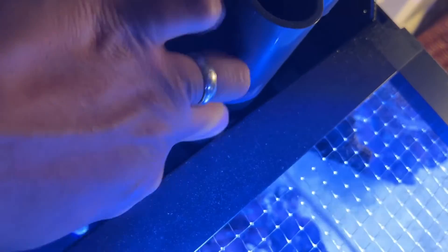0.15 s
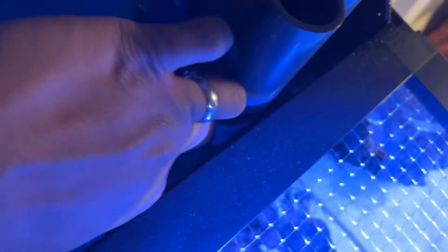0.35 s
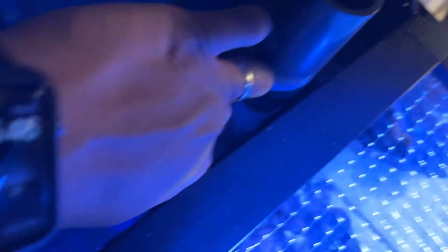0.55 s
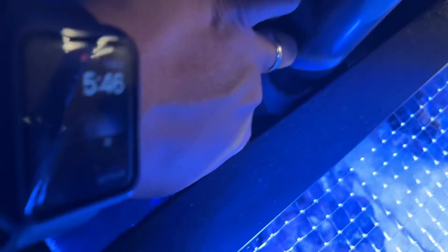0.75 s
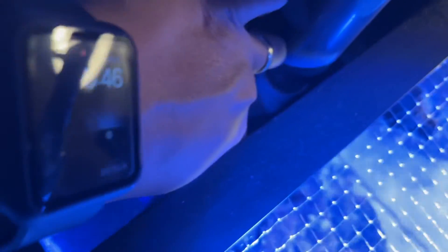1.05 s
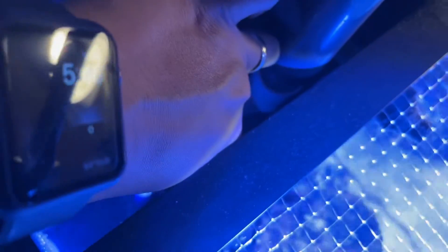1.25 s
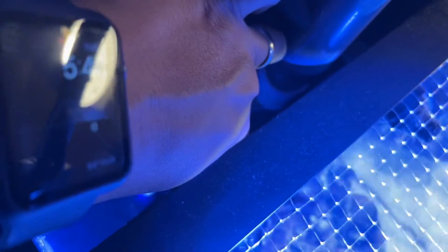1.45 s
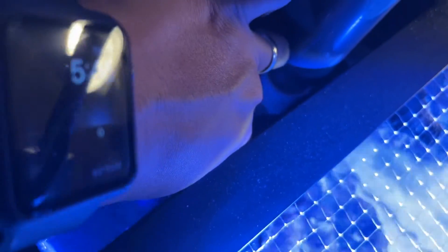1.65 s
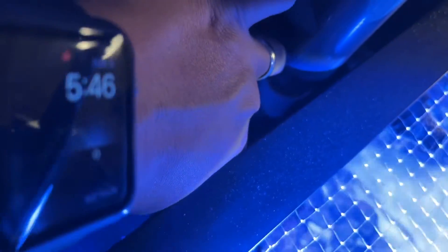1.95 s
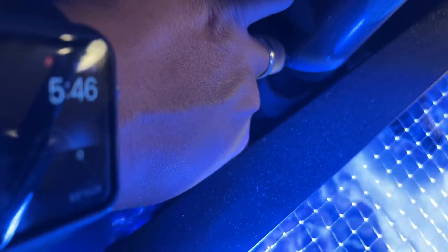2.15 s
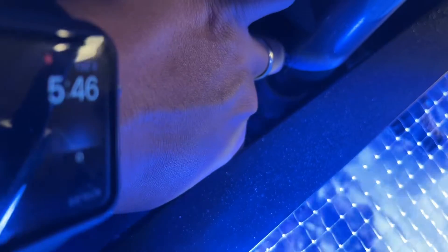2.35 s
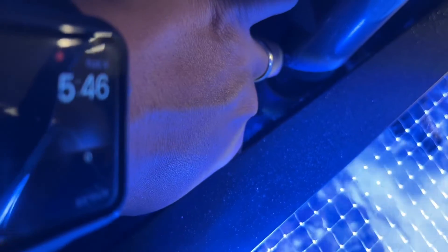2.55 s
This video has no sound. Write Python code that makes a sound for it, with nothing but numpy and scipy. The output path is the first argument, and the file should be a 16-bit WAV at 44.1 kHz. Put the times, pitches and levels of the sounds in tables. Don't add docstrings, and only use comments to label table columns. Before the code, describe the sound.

Water trickles into a hollow aquarium chamber with fine hiss, small drips and pitched overflow gulps, while a pump hums low and ticks rapidly; close stereo pickup, indoors, very little echo.

```python
import sys
import numpy as np
from scipy import signal
from scipy.fft import rfft, irfft, next_fast_len
from scipy.io import wavfile
from scipy.ndimage import uniform_filter1d, map_coordinates

SR = 44100
rng = np.random.default_rng(int(sys.argv[2]) if len(sys.argv) > 2 else 0)


def gain_from_decibels(decibels):
    exponent = np.asarray(decibels, float) / 20
    return 10 ** exponent


def store_pcm(level_fs):
    pcm = np.round(np.clip(level_fs, -1, 1) * 32767).astype(np.int16)
    wavfile.write(sys.argv[1], SR, np.atleast_2d(pcm).T)


N = 119070


def unit(x):
    return x / np.sqrt(np.mean(x ** 2) + 1e-20)


def along(points, hz):
    f, v = np.transpose(points)
    return np.interp(np.log(hz + 1), np.log(f + 1), v)


def curve(rows):
    return np.interp(np.arange(N) / SR, *np.transpose(rows))


def wobble(rate_hz):
    knots = rng.standard_normal(int(N * rate_hz / SR) + 4)
    return map_coordinates(knots, [np.arange(N) * rate_hz / SR])


def filtered(x, response):
    m = next_fast_len(N + 8192)
    return irfft(rfft(x, m) * response(np.fft.rfftfreq(m, 1 / SR)), m)[..., :N]


def patchy(patchy_db):
    z = signal.stft(rng.standard_normal((2, N)), nperseg=256)[2]
    field = uniform_filter1d(rng.standard_normal(z.shape[1:]), 5, 0)
    field = uniform_filter1d(field, 8, 1)
    return signal.istft(z * gain_from_decibels(patchy_db * unit(field)), nperseg=256)[1][:, :N]


def resonances(x, peaks):
    def response(f):
        total = 0
        for k, (hz, width_hz, db) in enumerate(peaks):
            damping = 1j * f * width_hz
            total = total + (-1) ** k * gain_from_decibels(db) * damping / (hz * hz - f * f + damping)
        return total
    return filtered(x, response)


def bubbles(s, db, hz, cycles, rise, onset=0.65, size=900):
    u = np.arange(size) / SR * hz[:, None]
    tone = np.sin(2 * np.pi * u * (1 + rise * u / (2 * cycles)))
    envelope = np.exp(-u / cycles) * (1 - np.exp(-(u / onset) ** 2))
    wave = gain_from_decibels(db)[:, None] * tone * envelope
    at = (s * SR).astype(int)[:, None] + np.arange(size)
    return np.bincount(at.ravel(), wave.ravel(), N + size)[:N]


def swarm(count, hz, spread, cycles, scatter_db):
    pair = []
    for _ in range(2):
        r = rng.random((count, 2))
        pitch_hz = np.clip(hz * np.exp(spread * rng.standard_normal(count)), 300, 15000)
        level_db = -scatter_db * np.log(1.36 * r[:, 1] + 0.035)
        pair.append(bubbles(r[:, 0] * N / SR, level_db, pitch_hz, cycles, 0.1155, size=600))
    return unit(np.array(pair))


def with_room(x):
    t60_s, room_db = .09, -11
    t = np.arange(SR // 5) / SR
    tail = rng.standard_normal((2, len(t))) * gain_from_decibels(-60 * t / t60_s)
    tail = tail / np.linalg.norm(tail[0])
    wet = signal.fftconvolve(x[None], tail, axes=1)[:, :N] * gain_from_decibels(room_db)
    return np.array([x + wet[0], wet[1] + .5 * np.roll(x, 40)])


# time in seconds, level in dB.
HUM = [(0.0, -37.5), (0.04, -36), (0.3, -36), (0.97, -38.5), (1.07, -37.5), (1.19, -40), (1.44, -37.5),
       (2.66, -37.5), (2.7, -40)]
# frequency in Hz, density in dB per Hz.
RUMBLE = [(25, -41), (58, -10), (82, -9.5), (102, -8.5), (142, -2.5), (178, -5), (300, -13.5), (500, -25)]


def pump():
    hum_hz, start_rad, rumble_db = 120.0, 2.2, -44.5
    phase = 2 * np.pi * hum_hz * np.arange(N) / SR + start_rad + 0.059 * wobble(7.8)
    hum = np.sqrt(2) * gain_from_decibels(curve(HUM)) * np.cos(phase)
    spectrum = [(11, -96), *RUMBLE, (800, -41), (1200, -95)]
    rumble = unit(filtered(patchy(0.74), lambda f: gain_from_decibels(along(spectrum, f))))
    return hum * [[1], [0]] + gain_from_decibels(rumble_db) * rumble


# frequency in Hz, level in dB, t60 in seconds, delay in seconds.
CASING = [
    (720, -5, .045, .003),
    (850, -2, .045, .004),
    (1060, -2, .016, 0),
    (1250, -1, .027, 0),
    (980, -8.5, .02, .0185),
]
# time in seconds, lag behind an even turn in ms.
ROTOR_LATE = [(0, .5), (.23, 4), (.74, -.8), (1.13, 2.5), (1.45, -.8), (1.71, .8), (1.89, 5.3), (2.15, 2.5),
              (2.3, -1), (2.7, .8)]


def rotor():
    start_s, ticks_per_s, tick_db, scatter_db = .0247, 11.27, -33, .7
    out = np.zeros(N + SR)
    t = np.arange(SR // 10) / SR
    attack = 1 - np.exp(-t / .0006)
    for s in np.arange(start_s, N / SR, 1 / ticks_per_s):
        r = rng.standard_normal((len(CASING) + 1, 3))
        late_s = np.interp(s, *np.transpose(ROTOR_LATE)) / 1000
        tick = gain_from_decibels(tick_db + scatter_db * r[-1, 1]) / 2
        for (hz, db, t60_s, delay_s), (a, b, c) in zip(CASING, r):
            tone = np.sin(2 * np.pi * hz * (1 + .015 * b) * t + .3 * c)
            ring = gain_from_decibels(db + a - 60 * t / t60_s) * tone * attack
            out[round((s + late_s + delay_s) * SR):][:len(t)] += tick * ring
    return with_room(out[:N])


# time in seconds, level in dB.
FLOW = [(0.0, -59.5), (.4, -57.5), (.75, -61), (1.2, -59.5), (2.0, -61), (2.7, -61)]
# frequency in Hz, width in Hz, level in dB.
CHAMBER = [(322, 105, -5), (720, 83, 2), (858, 222, -2.5), (1082, 91, -3.5), (1308.4, 22.6, -3.5),
           (2563, 283, -15)]
# frequency in Hz, density in dB per Hz.
HISS = [(1200, 1.5), (2000, -2.5), (3400, -6.5), (4800, -2.5), (7600, -6.5), (8700, 2), (9800, -5.5),
        (15700, -8.5)]


def trickle():
    chamber_db, bubble_db = -53, -60.5
    hiss_db, fizz_db, spray_db = 3.5, -4.5, -12
    flow_db = curve(FLOW)
    swing_db = flow_db - flow_db.mean()
    hollow = unit(resonances(patchy(1.4), CHAMBER))
    hollow = gain_from_decibels(chamber_db + .5 * swing_db + wobble(9.3)) * hollow
    gurgle = swarm(count=500, hz=993, spread=0.3365, cycles=3.87, scatter_db=4.0)
    gurgle = gain_from_decibels(bubble_db + swing_db) * gurgle

    def coloured(x):
        return unit(filtered(x, lambda f: gain_from_decibels(along([(600, -78), *HISS], f))))

    hiss = gain_from_decibels(hiss_db + 0.18 * wobble(14)) * coloured(patchy(2.6))
    fizz = swarm(count=1500, hz=5084, spread=.5, cycles=5.9, scatter_db=2.5)
    spray = swarm(count=400, hz=11000, spread=.25, cycles=1.5, scatter_db=4)
    surface = hiss + gain_from_decibels(fizz_db) * coloured(fizz) + gain_from_decibels(spray_db) * coloured(spray)
    return hollow + gurgle + gain_from_decibels(flow_db) * surface


# start in
# seconds, peak in dB, pitch in Hz.
GULPS = [(0.293, -43.5, 1386), (0.38, -45, 1330), (0.468, -39, 1420), (0.539, -33.5, 1490),
         (0.571, -29, 1560), (0.646, -40, 1510), (0.733, -40, 1500), (0.837, -44, 1560), (0.899, -38, 1440),
         (1.073, -35, 1466), (1.09, -58, 1390), (1.109, -32, 1516), (1.126, -38, 1550), (1.558, -32, 1490),
         (1.575, -26.5, 1490), (1.608, -33.5, 1500), (1.699, -36, 1560), (1.754, -43, 1540),
         (1.775, -32, 1560), (1.822, -44, 1560), (1.983, -32.5, 1415), (2.122, -32, 1490),
         (2.231, -36.5, 1465), (2.304, -34.5, 1510), (2.359, -40, 1560), (2.419, -43, 1375)]
# frequency in Hz, gain in dB.
TUBE_EDGE = [(900, 1), (1250, 12), (1500, 3.5), (1680, 1.5), (1780, -38), (2500, -44)]
# frequency in Hz, width in Hz, level in dB.
LINGER = [(1558, 30, -4)]


def tube():
    drone_db, gulp_db = -65, 10
    blow = rng.standard_normal(N) * gain_from_decibels(2.0 * wobble(39.6))
    drone = gain_from_decibels(drone_db) * unit(resonances(blow, [(1560, 58, 0), (1350, 400, -8)]))
    s, db, hz = np.transpose(GULPS)
    gulps = bubbles(s + .001, db + gulp_db, hz, cycles=3.45, rise=0.017, onset=5.1, size=1200)
    across = filtered(drone + gulps, lambda f: gain_from_decibels(along(TUBE_EDGE, f)))
    return across * [[1], [-.75]] + resonances(np.roll(across, 150), LINGER)


# start in seconds, peak in dB, pitch in Hz.
PRICKS = [(0.2134, -48, 12200), (0.2942, -49, 12000), (0.3376, -43, 11900), (0.3561, -47, 11600),
          (0.636, -44, 11500), (0.7292, -49, 11900), (0.7766, -47, 11300), (0.8609, -47, 10600),
          (0.9313, -47, 12400), (1.053, -44, 12400), (1.109, -42, 11600), (1.1298, -48, 13200),
          (1.1882, -52, 12600), (1.3463, -52, 10300), (1.508, -46, 10200), (1.5808, -44, 13400),
          (1.6182, -45, 11600), (1.7454, -51, 12700), (1.8866, -50, 12800), (1.9744, -53, 11700),
          (2.0188, -48, 11700), (2.0457, -47, 11700), (2.4768, -52, 10800), (2.5142, -51, 13100),
          (2.5666, -51, 13000), (2.5945, -48, 11400), (2.6863, -46, 12100)]
# start in seconds, peak in dB, pitch in Hz.
DROPLETS = [(0.154, -53, 3800), (0.4583, -46, 4100), (0.6687, -49, 4440), (0.7128, -51, 4270),
            (0.7377, -52, 5770), (0.832, -48, 5680), (0.9066, -46.5, 4080), (1.0103, -52, 4280),
            (1.0345, -46, 5030), (1.5324, -46, 6270), (1.5574, -50, 4640), (1.5815, -48, 5670),
            (1.7295, -52, 5650), (1.7875, -45, 4830), (1.8297, -46.5, 5810), (1.8871, -50, 4680),
            (2.139, -44.5, 5800), (2.157, -54, 3900), (2.269, -49, 4770), (2.3555, -51, 4750),
            (2.3636, -48, 4200), (2.6279, -53, 4300)]
# start in seconds, peak in dB, pitch in Hz.
BLIPS = [(0.1111, -49, 2700), (0.4454, -53, 2230), (0.4584, -45.5, 2310), (0.5392, -48, 1730),
         (0.5601, -50, 2040), (0.5726, -45, 1650), (0.605, -44, 1740), (0.9495, -48, 2600),
         (1.035, -52, 2330), (1.1278, -43.5, 1700), (1.4436, -49, 2640), (1.6618, -50, 1710),
         (1.774, -48, 1820), (1.8068, -57, 2090), (2.1216, -49, 1760), (2.2276, -52, 2400),
         (2.2942, -54, 2450), (2.325, -45, 1820)]


def sprinkle():
    out = 0
    for rows, more_db, cycles in [(PRICKS, 5, 4.3), (DROPLETS, 3, 7.5), (BLIPS, 1.5, 5.3)]:
        s, db, hz = np.transpose(rows)
        out = out + bubbles(s, db + more_db, hz, cycles, 0.043, size=900)
    return out


# start in seconds, peak in dB, pitch in Hz.
DROPS = [(0.2605, -38.5, 4400), (0.3725, -43.5, 1710), (.416, -37, 692), (0.6424, -40, 1720),
         (0.659, -42.5, 2080), (.597, -47, 2200), (.615, -47, 2210), (.764, -34, 720), (0.837, -45.5, 1680),
         (.836, -41, 5730), (0.8633, -47, 4470), (0.9018, -37.5, 1810), (1.052, -41, 4150),
         (1.1804, -37.5, 6000), (1.239, -39, 5840), (1.323, -40, 5800), (1.4594, -38.5, 2610),
         (1.5622, -42.5, 1780), (1.8756, -43, 5670), (1.849, -42.5, 698), (2.025, -38.5, 940),
         (2.221, -39, 5900), (2.362, -43.5, 1780), (2.4034, -39.5, 4420), (2.524, -34.5, 960)]
# start in seconds, peak in dB, pitch in Hz.
SPITS = [(0.111, -40, 12600), (0.2644, -39, 12090), (0.3563, -36, 9100), (.404, -39, 10800),
         (0.4589, -34, 11000), (1.07, -37, 10800), (1.533, -35, 7500), (1.5817, -40, 9400),
         (1.68, -37, 14000), (1.6888, -31.5, 8800), (1.874, -38, 14500), (2.0657, -40, 9500),
         (2.3943, -33, 10250), (2.455, -40, 14000), (1.591, -42, 12500), (1.763, -40, 14000)]


def drips():
    drops = bubbles(*np.transpose(DROPS), cycles=7.5, rise=0.012, size=1500)
    s, db, hz = np.transpose(SPITS)
    spits = bubbles(s, db, hz, cycles=8.2, rise=0.071, size=300)
    snaps = bubbles(s, db + 2, 0.82 * hz, cycles=1, rise=0, size=60)
    return drops + spits + snaps + sprinkle()


# seconds after impact, peak in dB, pitch in Hz.
SPLASH = [
    (.0003, -37, 2650),
    (.0017, -31.5, 3150),
    (.0003, -37, 4700),
    (.0004, -40, 6200),
    (.0015, -39, 2000),
    (.0006, -36, 8200),
    (.002, -38, 9100),
    (.004, -40, 3400),
    (.0075, -44, 3200),
]


def splash():
    start_s, crack_db, crack_t60_s = 1.2191, -37, .018
    t = np.arange(N) / SR - start_s
    noise = filtered(rng.standard_normal(N), lambda f: (f > 1500) / (1 + f / 6000))
    crack = (t > 0) * gain_from_decibels(crack_db - 60 * np.abs(t) / crack_t60_s) * noise
    after_s, db, hz = np.transpose(SPLASH)
    return crack + bubbles(start_s + after_s, db, hz, cycles=7, rise=0.04, size=900)


def whistle():
    hz, width_hz, db, end_s, fade_s = 3780, 99, -67, 0.23, 0.041
    tone = unit(resonances(rng.standard_normal(N), [(hz, width_hz, 0)]))
    fade = 1 + np.exp((np.arange(N) / SR - end_s) / fade_s)
    return gain_from_decibels(db) * tone / fade * [[1], [0]]


# frequency in Hz, left lead in radians.
LEAD = [(0, -0.000031), (1000, 0.84), (2000, 0.3), (3000, 1), (5300, -1.27), (6500, -1.11)]
# frequency in Hz, coherence from 0 to 1.
ALIKE = [(40, .96), (120, .99), (400, .88), (1000, .65), (2000, .7), (4000, .55), (6000, .6), (7600, .9)]
# frequency in Hz, left over right in dB.
LEFT = [(100, .5), (300, 2), (750, 4), (2000, 1.5), (5000, 2.5), (7500, 0)]
# frequency in Hz, further lead in half turns.
HALF_TURNS = [(6500, 0), (8300, -1), (12100, -2), (15300, -3)]


def ports(pair):
    def response(f, sign):
        turn = np.arccos(np.clip(along(ALIKE, f), 0, 1)) / 2
        lead = np.interp(f, *np.transpose(LEAD))
        lead = lead - LEAD[-1][1] * np.clip((f - 6500) / 1800, 0, 1)
        lead = lead + np.pi * np.interp(f, *np.transpose(HALF_TURNS))
        gain = gain_from_decibels(sign * along(LEFT, f) / 2) * np.exp(.5j * sign * lead)
        return gain * [np.cos(turn), sign * np.sin(turn)]
    return np.array([filtered(pair, lambda f: response(f, sign)).sum(0) for sign in (1, -1)])


def scene():
    heard = pump() + rotor() + trickle() + with_room(drips() + splash()) + whistle()
    return ports(heard) + tube()


def roll_off(x):
    return signal.sosfilt(signal.butter(12, 15730, fs=SR, output="sos"), x)


def record(dry):
    return roll_off(dry)


dry = scene()
out = record(dry)
store_pcm(out)
```